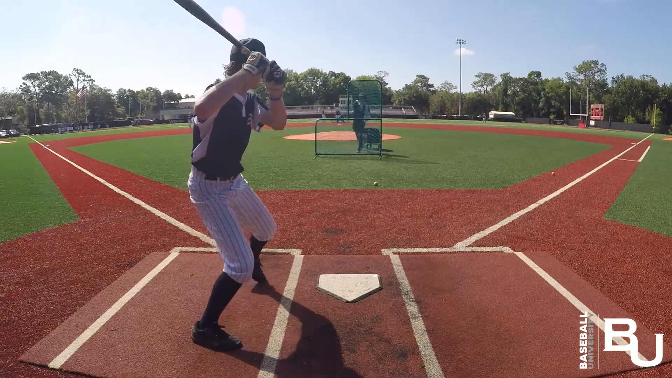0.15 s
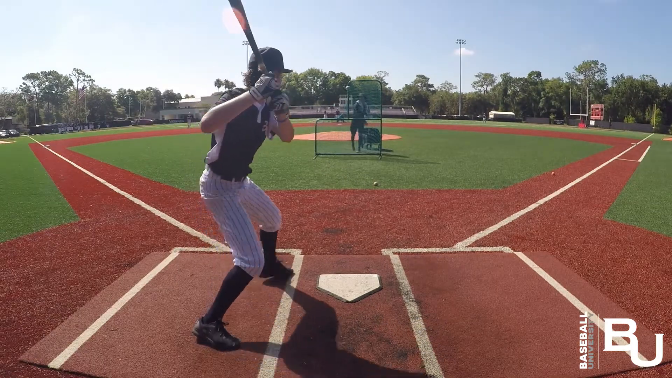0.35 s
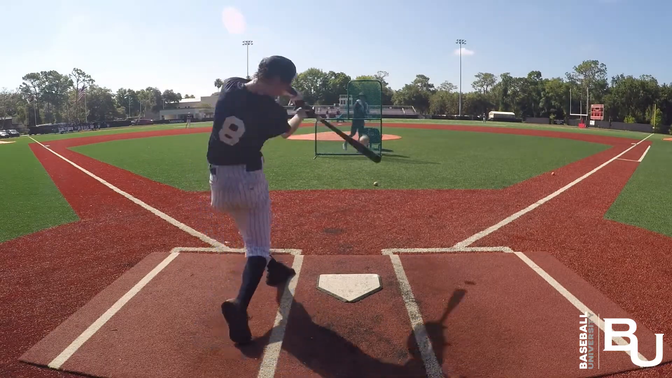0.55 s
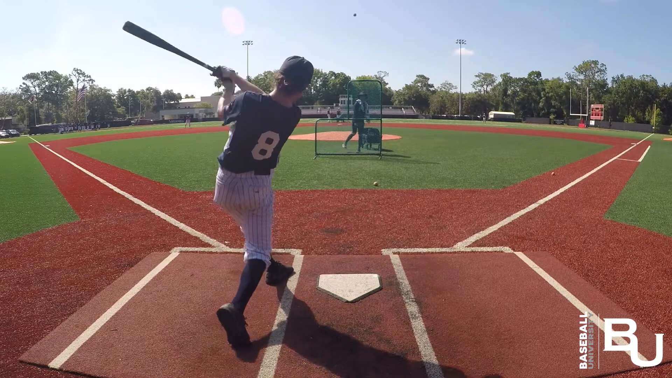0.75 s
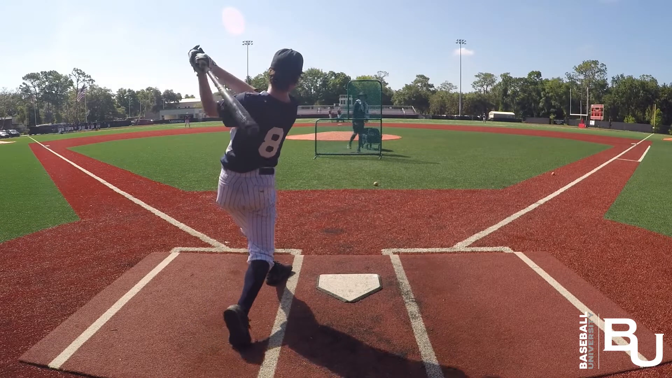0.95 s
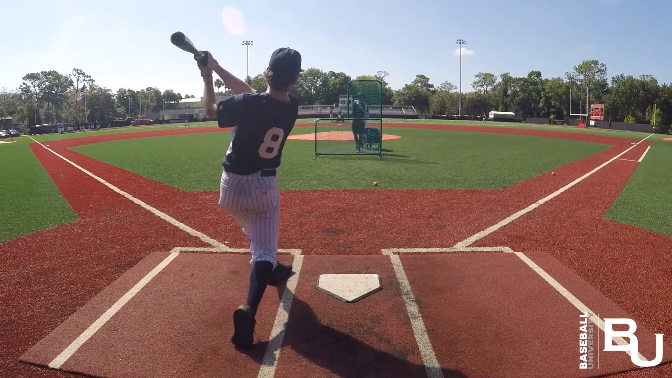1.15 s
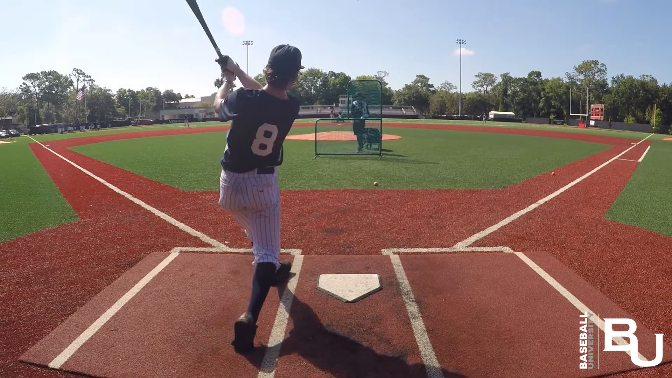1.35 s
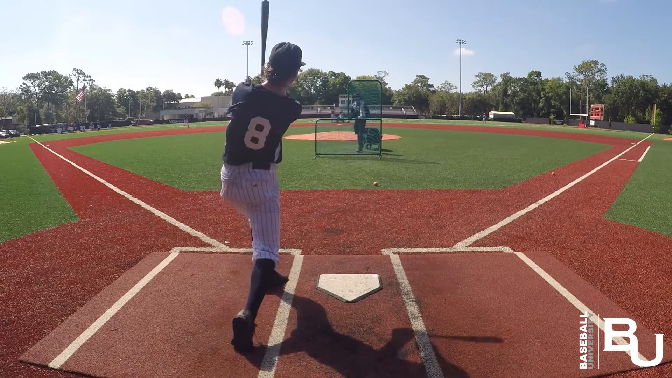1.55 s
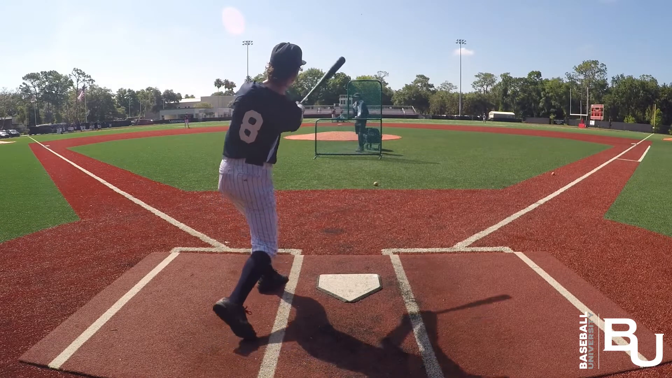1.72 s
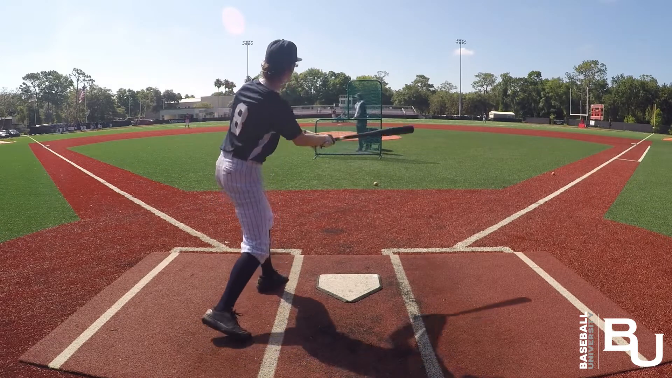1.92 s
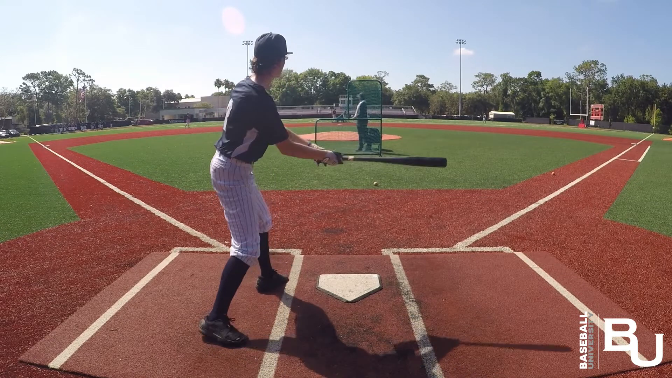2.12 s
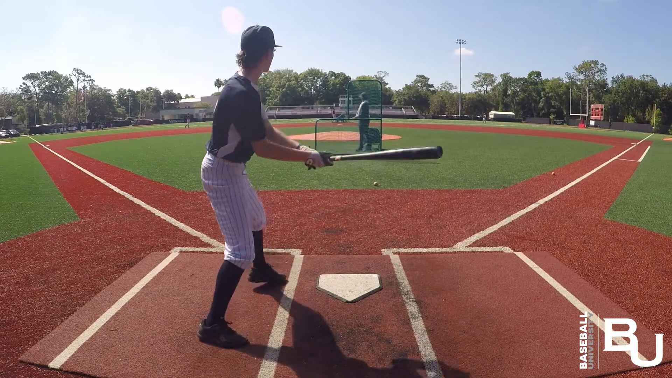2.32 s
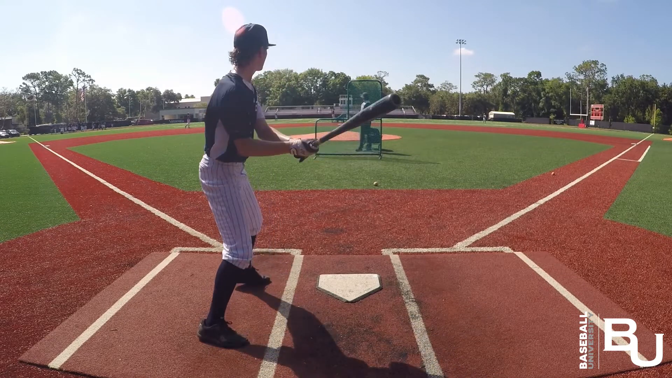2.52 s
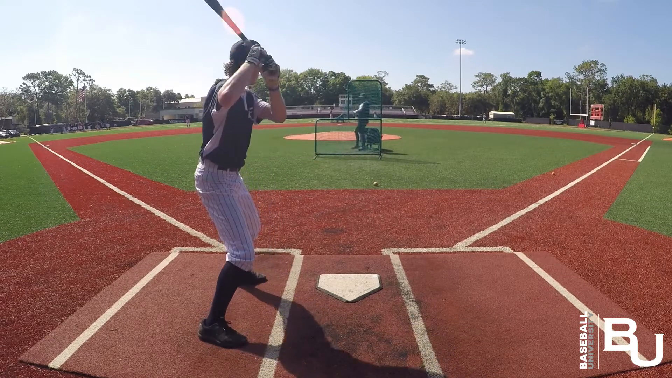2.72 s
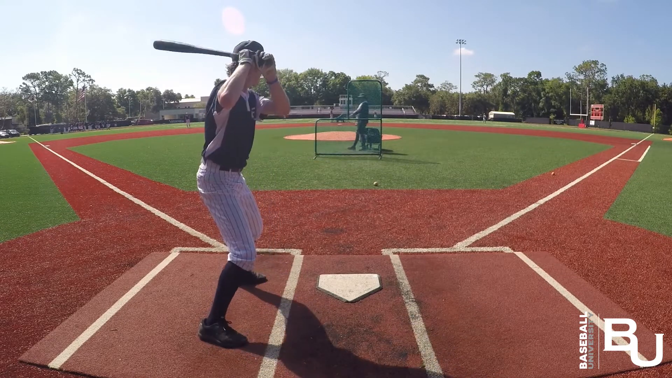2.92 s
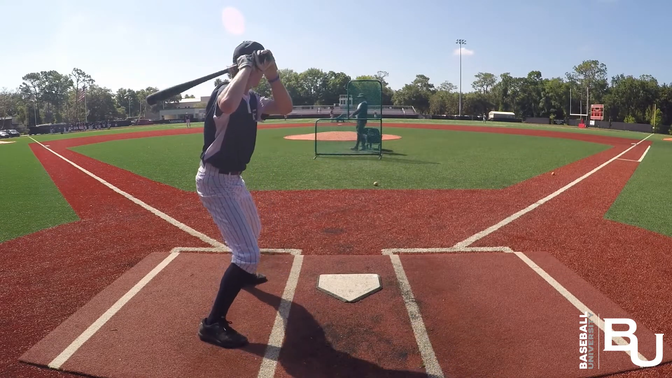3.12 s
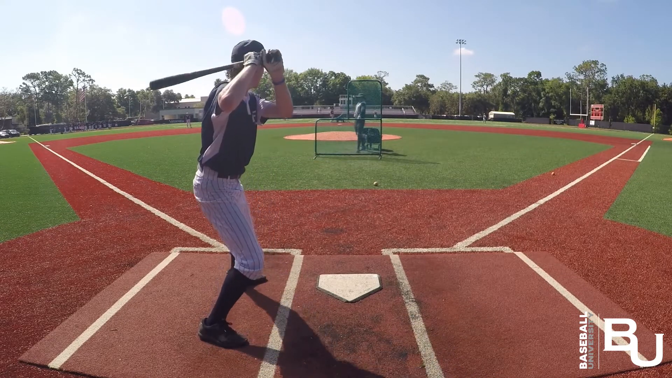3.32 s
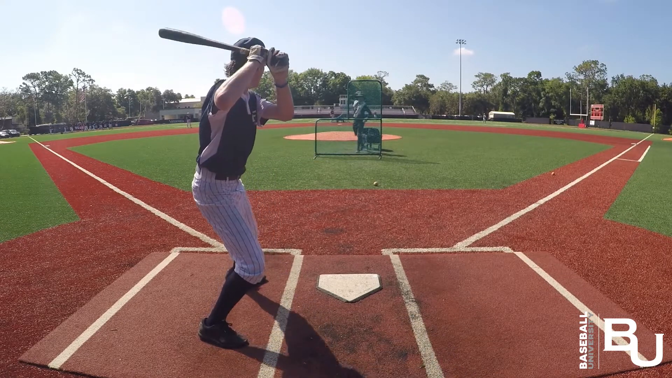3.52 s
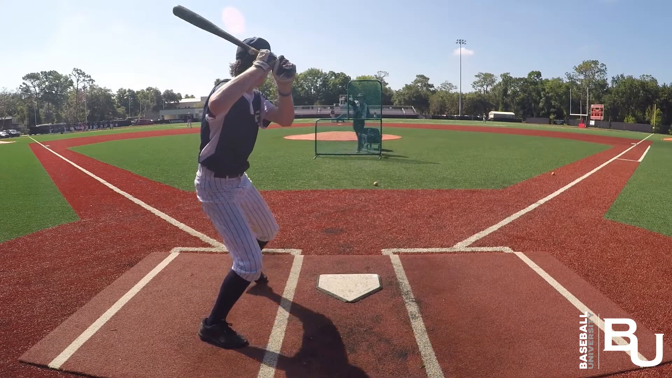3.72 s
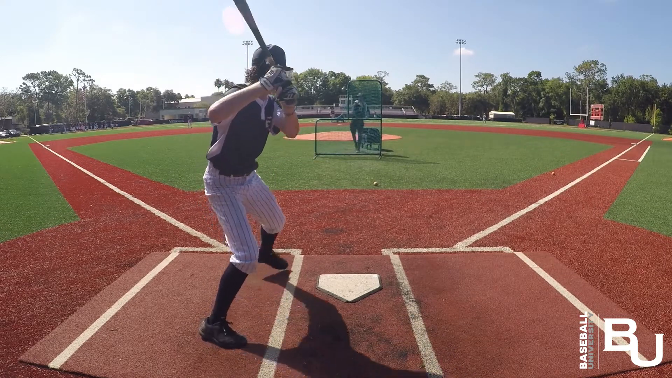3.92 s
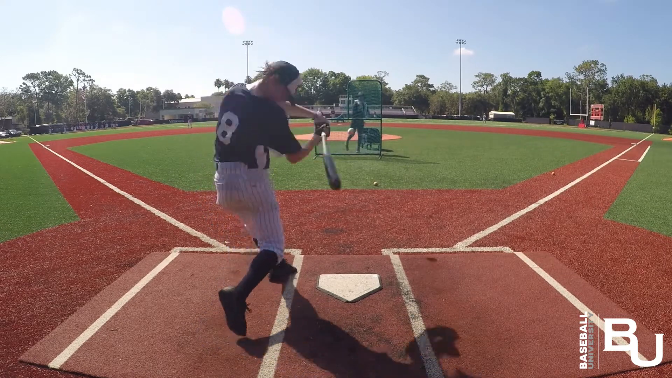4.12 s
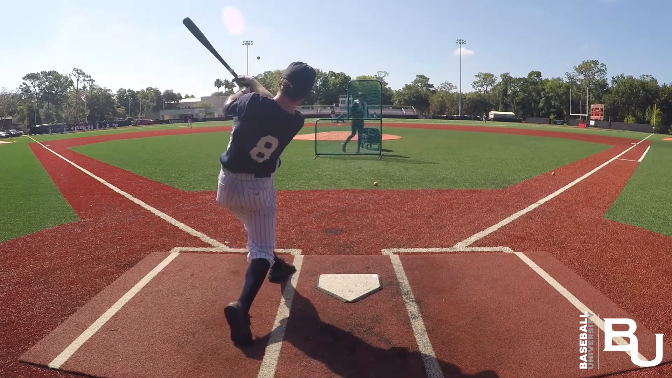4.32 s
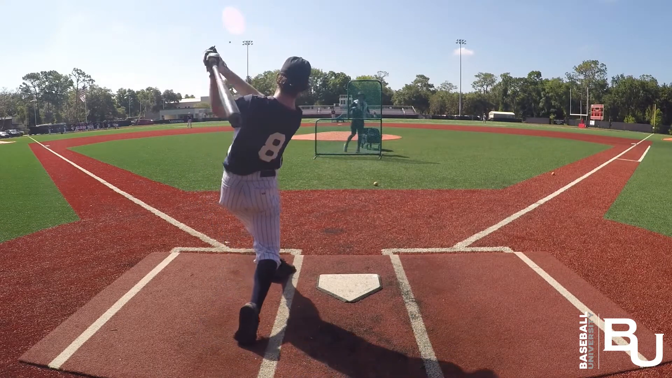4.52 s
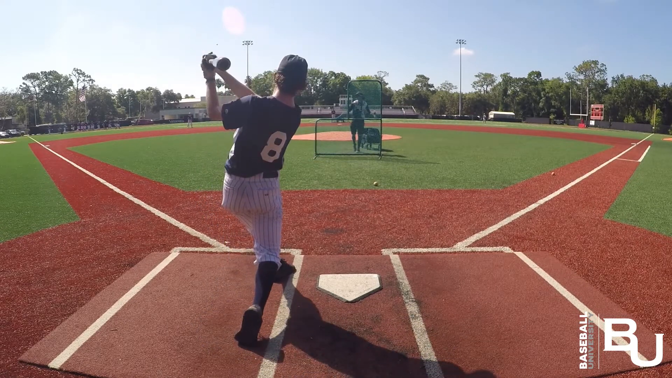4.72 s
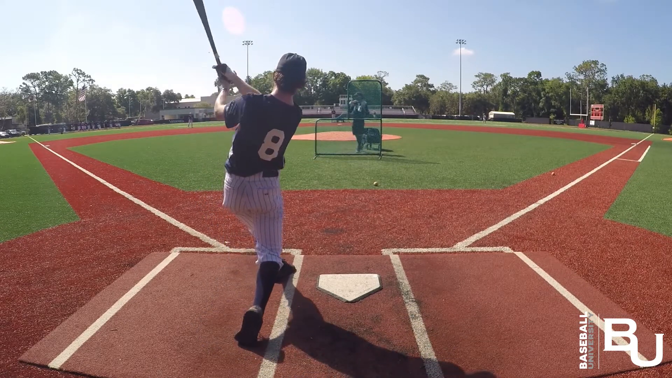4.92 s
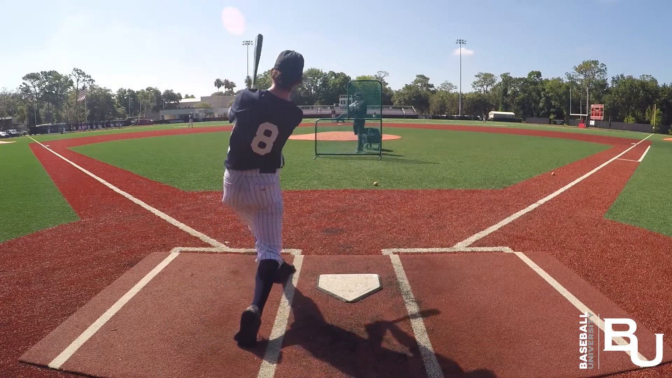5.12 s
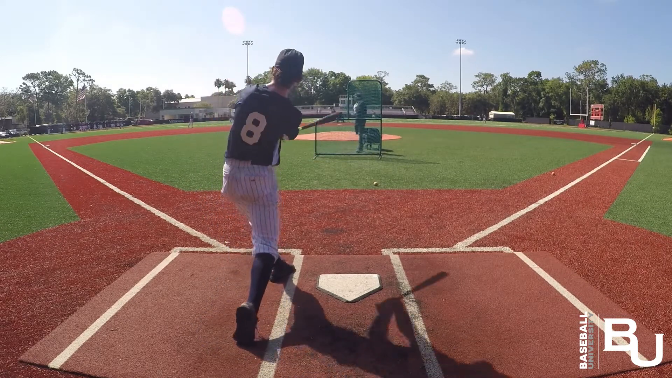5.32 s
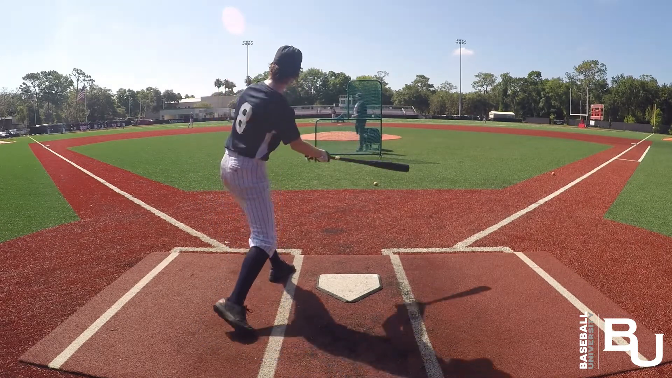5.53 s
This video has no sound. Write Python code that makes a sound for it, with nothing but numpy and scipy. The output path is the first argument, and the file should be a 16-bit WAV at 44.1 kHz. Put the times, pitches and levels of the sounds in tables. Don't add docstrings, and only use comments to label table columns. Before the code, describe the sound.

Two loud, dry bat cracks ring out during batting practice, with scattered field echoes, soft shoe scuffs, distant chirps and quiet traffic.

```python
import sys
import numpy as np
from scipy import signal
from scipy.fft import rfft, irfft, next_fast_len
from scipy.io import wavfile
from scipy.ndimage import uniform_filter1d, map_coordinates

SR = 44100
rng = np.random.default_rng(int(sys.argv[2]) if len(sys.argv) > 2 else 0)


def ratio_of_db(decibels):
    return 10 ** (np.asarray(decibels, float) / 20)


def transcribe(signal):
    frames = np.atleast_2d(signal).T
    limited = np.clip(frames, -1, 1)
    pcm = np.round(limited * 32767).astype(np.int16)
    wavfile.write(sys.argv[1], SR, pcm)


N = 245195


def unit(x):
    return x / np.sqrt(np.mean(x ** 2) + 1e-20)


def along(points, hz):
    f, v = np.transpose(points)
    return np.interp(np.log(hz + 1), np.log(f + 1), v)


def filtered(x, response):
    m = next_fast_len(len(x) + 8192)
    return irfft(rfft(x, m) * response(np.fft.rfftfreq(m, 1 / SR)), m)[:len(x)]


def resonances(modes, f):
    total = 0
    for k, (centre, width, db) in enumerate(modes):
        total = total + (-1) ** k * ratio_of_db(db) * 1j * f * width / (centre ** 2 - f * f + 1j * f * width)
    return total


def tilted(db_per_octave, f):
    return db_per_octave * np.log2((f + 300) / 2500)


def wobble(rate):
    knots = rng.standard_normal(int(N * rate / SR) + 4)
    return map_coordinates(knots, [np.arange(N) * rate / SR])


def add(track, s, sound):
    part = track[round(s * SR):][:len(sound)]
    part += sound[:len(part)]


def patches(x, patchy_db, window, bins, frames):
    z = signal.stft(x, nperseg=window)[2]
    field = uniform_filter1d(rng.standard_normal(z.shape), size=bins, axis=0)
    field = uniform_filter1d(field, size=frames, axis=1)
    return signal.istft(z * ratio_of_db(patchy_db * unit(field)), nperseg=window)[1][:len(x)]


def rush(spectrum, patchy_db):
    noise = patches(rng.standard_normal(N + SR), patchy_db, window=512, bins=6, frames=12)[:N]
    return unit(filtered(noise, lambda hz: ratio_of_db(along(spectrum, hz))))


def gritty(length, clump):
    level_db = 2 * np.repeat(rng.standard_normal(length // clump + 1), clump)[:length]
    return rng.standard_normal(length) * ratio_of_db(level_db)


def ambience():
    # time in seconds, strength in dB.
    traffic = [(0.0, -59.5), (0.48, -57), (0.66, -53.5), (1.05, -60.5), (1.31, -56.5), (5.37, -58),
               (5.56, -53)]
    # frequency in Hz, density in dB per Hz.
    rumble_colour = [(8.8, -32), (15, -0.5), (38, -4), (69, -6.5), (108, -12.5), (200, -25), (260, -42.5),
                     (440, -120)]
    # frequency in Hz, density in dB per Hz.
    air_colour = [(88, -31), (150, 1), (827, -11), (1110, -9), (1240, -13.5), (1340, -7), (1450, -14),
                  (1570, -9.5), (1700, -12), (2650, -14), (2980, -16), (3760, -14.5), (4560, -18),
                  (14600, -28.5), (15500, -33)]
    s, strength_db = np.transpose(traffic)
    strength_db = np.interp(np.arange(N) / SR, s, strength_db)
    rumble = ratio_of_db(strength_db + 3 + .5 * wobble(8.4)) * rush(rumble_colour, patchy_db=0.3)
    air_db = -61 + .15 * (strength_db - strength_db.mean())
    return rumble + ratio_of_db(air_db) * rush(air_colour, patchy_db=0.4)


def frame_tick():
    frame_rate = 29.97
    t = np.arange(N) / SR
    frame = t * frame_rate - .02
    gate = uniform_filter1d(1. * (frame % 1 < .18), size=30)
    draws = rng.uniform(0, 1, (2, int(frame[-1]) + 2))
    start, size = draws[:, (frame + 1).astype(int)]
    tone = np.sin(2 * np.pi * (8530 * t + start)) + 0.35 * np.sin(2 * np.pi * (6200 * t + size))
    return ratio_of_db(-73.5 + 1.3 * size) * gate * tone


def machine():
    # centre in seconds, width in seconds, level in dB.
    breeze = [(.09, 0.069, -73.5), (.5, 0.3, -74.5), (.9, 0.098, -72), (1.3, .12, -68.5),
              (2.03, 0.063, -65), (2.23, 0.066, -69), (2.4, 0.072, -77.5), (2.66, 0.059, -74)]
    whine_hz = 1320
    t = np.arange(N) / SR
    spells = sum(ratio_of_db(db) * np.exp(-.5 * ((t - s) / width) ** 2) for s, width, db in breeze)
    phase = 2 * np.pi * np.cumsum(whine_hz + 4 * wobble(10)) / SR
    whine = np.sin(phase) + ratio_of_db(-16) * np.sin(2 * phase)
    return np.sqrt(2) * spells * ratio_of_db(2.5 * wobble(22)) * whine


def birds():
    # start in seconds, length in seconds, start and end pitch in Hz, level in dB.
    calls = [(.295, 0.036, 2715, 2650, -68), (0.814, 0.054, 6100, 6770, -69),
             (.883, .088, 6850, 7360, -74.5), (1.585, .04, 2860, 2780, -71), (2.24, .06, 2680, 2700, -75),
             (2.35, .06, 2710, 2760, -77), (3.263, .04, 2620, 2330, -73), (3.42, .045, 2420, 2500, -73),
             (3.74, 0.067, 2900, 2420, -69), (3.909, 0.082, 2290, 2340, -66), (4.93, .04, 2550, 2600, -73),
             (5.385, 0.064, 2740, 2890, -74), (5.432, 0.057, 2880, 2200, -66.5)]
    fall_bend, rise_bend = 2.1, .55
    flutter_db = 2
    out = np.zeros(N)
    for s, length, start_hz, end_hz, db in calls:
        u = np.linspace(0, 1, round(length * SR))
        bend = fall_bend if end_hz < start_hz else rise_bend
        hz = start_hz + (end_hz - start_hz) * u ** bend
        tone = np.sqrt(2) * np.sin(2 * np.pi * np.cumsum(hz) / SR)
        add(out, s, ratio_of_db(db) * signal.windows.tukey(len(u), 0.3) * tone)
    return out * ratio_of_db(flutter_db * wobble(70))


def scuffs():
    # start in seconds, length in seconds, level in dB, tilt in dB per octave.
    rubs = [(0.422, 0.04, -54, -4.5), (0.485, 0.066, -58.5, -3.5), (0.573, 0.0084, -53, -3),
            (0.581, 0.073, -62, -11), (1.568, 0.028, -64, -8), (1.848, 0.025, -60, -13.5),
            (1.96, .008, -60.5, -5), (2.131, 0.019, -66, -1), (2.948, 0.0068, -66.5, 9),
            (3.305, 0.046, -73, -8.5), (3.672, 0.0084, -62.5, -5), (4.04, 0.051, -57.5, -5.5),
            (4.093, 0.058, -56.5, -3.5), (4.159, 0.12, -66, -1), (4.806, 0.017, -61, -10),
            (4.819, 0.021, -58.5, -23), (5.332, .01, -66, 5)]
    # frequency in Hz, width in Hz, level in dB.
    case = [(1150, 240, -3.5), (1690, 300, -4), (2380, 400, 0), (3570, 490, 0), (5000, 900, -5)]
    out = np.zeros(N)
    for s, length, db, tilt in rubs:
        grit = gritty(SR // 8, 100)
        rub = unit(filtered(grit, lambda f: np.abs(resonances(case, f)) ** 1.8 * ratio_of_db(tilted(tilt, f))))
        u = np.arange(SR // 8) / SR / length
        add(out, s, ratio_of_db(db) * rub * np.clip(4 * u, 0, 1) * np.exp(-u ** 3))
    return out


def shake():
    t = np.arange(SR // 2) / SR
    noise = rng.standard_normal(len(t))
    low = unit(filtered(noise, lambda f: resonances([(46, 60, 0)], f) / (1 + (f / 75) ** 6)))
    return ratio_of_db(-47 - 60 * t / 1.8) * (1 - np.exp(-t / 0.0023)) * low


def far(tilt):
    # delay in seconds, size in dB, hardness (brightness) in dB.
    fences = [(.0128, -1.5, 0), (.021, 0, -14), (.03, 0, -5), (.041, -4, 3), (.051, 1, 2), (.068, -7, 6),
              (.095, -6, 3), (0.117, -3.5, 2), (0.135, -1, 2), (.165, -8, 10), (.192, -4.5, 4),
              (0.251, -1.5, -6), (.33, -3, -6.5), (.38, 0, -6)]
    # frequency in Hz, time to fall 60 dB in seconds.
    tail_decay = [(800, 1.0), (1120, 0.58), (1650, 1.2), (2100, 0.7025), (2500, 1.3), (3000, 0.55),
                  (3700, .62), (8000, .3)]
    # frequency in Hz, level in dB.
    returned = [(300, -29.5), (700, -15.5), (1100, 0), (1700, 1), (2500, -2), (3100, 5.5), (3800, -3),
                (5000, -6.5), (6900, -8), (9000, -24), (15000, -41.5)]
    # frequency in Hz, width in Hz, level in dB.
    returned_ring = [(1094, 120, -1.5), (1680, 210, -0.5), (2494, 120, 3.5), (3147, 150, -3),
                     (3720, 500, -5.5)]
    echo_db, loss_db_per_s = -32.5, 89
    smear_s, smear_per_s = 0.0024, .028
    dulling_db_per_s = 14.5

    def colour(f):
        return ratio_of_db(along(returned, f) + tilted(tilt, f))

    noise = unit(filtered(rng.standard_normal(SR), colour))
    hz, frames, z = signal.stft(noise, SR, nperseg=256)
    decay = ratio_of_db(-60 * frames / along(tail_decay, hz)[:, None])
    tail = signal.istft(z * decay, SR, nperseg=256)[1][:SR]
    t = np.arange(SR) / SR
    answer = ratio_of_db(-44.5) * tail * (1 - np.exp(-(t / 0.026) ** 2))

    facets = unit(filtered(gritty(SR, 40), colour))
    body = filtered(facets, lambda f: 1 / (1 + (f / 4700) ** 6))
    for delay, size_db, hard_db in fences:
        swell = np.exp(-.5 * ((t - delay) / (smear_s + smear_per_s * delay)) ** 2)
        sound = body + ratio_of_db(hard_db - dulling_db_per_s * delay) * (facets - body)
        answer += ratio_of_db(echo_db - loss_db_per_s * delay + size_db) * swell * sound
    answer = patches(answer, 2.2, window=256, bins=4, frames=5)
    ringing = filtered(answer, lambda f: resonances(returned_ring, f))
    return ratio_of_db(4.5) * (ringing + .2 * answer)


def near(blow, index):
    # delay in seconds, level in dB at the first blow, level in dB at the second.
    close_walls = [(.00115, -2, -6), (.00226, -12, -40), (.00357, -17, -23.5), (.00811, -22, -33),
                   (0.0123, -27.5, -24)]
    out = blow.copy()
    for wall in close_walls:
        add(out, wall[0], ratio_of_db(wall[1 + index]) * blow)
    return out


def bat(index, crack_db):
    # frequency in Hz, time to fall 60 dB in seconds, level in dB at the first and second blow.
    barrel = [(165, 0.015, -35.5, -22.5), (360, .017, -29.5, -18), (904, .04, -32.5, -31.5),
              (1133, .039, -11, -9.5), (1320, .0041, 3, 3.5), (1575, .0076, 0.87, 3.5),
              (2127, .029, 2.7, 1.2), (2414, 0.016, 4.5, 5.5), (3087, 0.012, -2, 10.5),
              (3560, .0085, -12.5, 5), (3790, 0.017, -10.5, 4.5), (4018, 0.019, -12.5, -7),
              (4868, 0.01301, -9, -4), (6408, .0053, -12, -23)]
    t = np.arange(SR // 10) / SR
    contact = (1 - np.exp(-t / .0008)) ** 1.6
    ring = np.zeros(len(t))
    for k, mode in enumerate(barrel):
        decay = ratio_of_db(mode[2 + index] - 60 * t / mode[1])
        ring += (-1) ** k * decay * np.sin(2 * np.pi * mode[0] * t)
    bright = np.diff(rng.standard_normal(len(t) + 1))
    spit = bright * (t / .0012) * np.exp(1 - t / .0012)
    return ring * contact + ratio_of_db(crack_db) * spit


def hits():
    # start in seconds, strength in dB, splinter crack in dB, echo in dB, echo tilt in dB per octave.
    blows = [
        (0.6173, -0.5, -46.5, 1, -3),
        (4.237, 0, -36, 0, -2),
    ]
    out = np.zeros(N)
    for index, (s, db, crack_db, echo_db, echo_tilt) in enumerate(blows):
        add(out, s, near(ratio_of_db(db) * bat(index, crack_db), index))
        add(out, s, ratio_of_db(echo_db) * far(echo_tilt))
        add(out, s, shake())
    return out


def scene():
    return (ambience() + machine() + birds() + scuffs() + hits())[None]


def top_cut(x):
    return signal.sosfilt(signal.butter(12, 16490, fs=SR, output="sos"), x)


def record(dry):
    x = dry[0] + frame_tick()
    x = x / (1 + np.abs(x / .96) ** 8) ** (1 / 8)
    x = filtered(x, lambda f: ratio_of_db(np.interp(f, [15200, 15500, 16400, 16600], [0, -16, -20, -90])))
    return top_cut(x[None])


dry = scene()
out = record(dry)
transcribe(out)
```